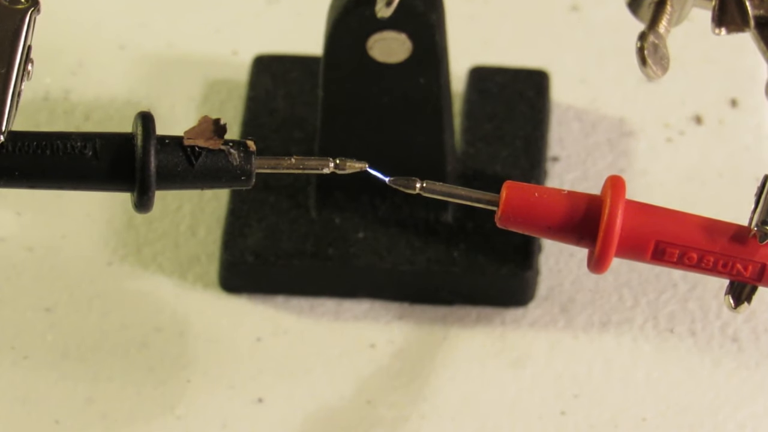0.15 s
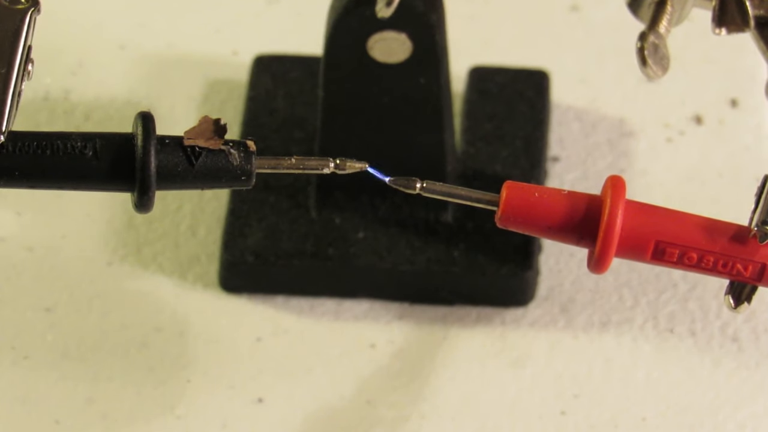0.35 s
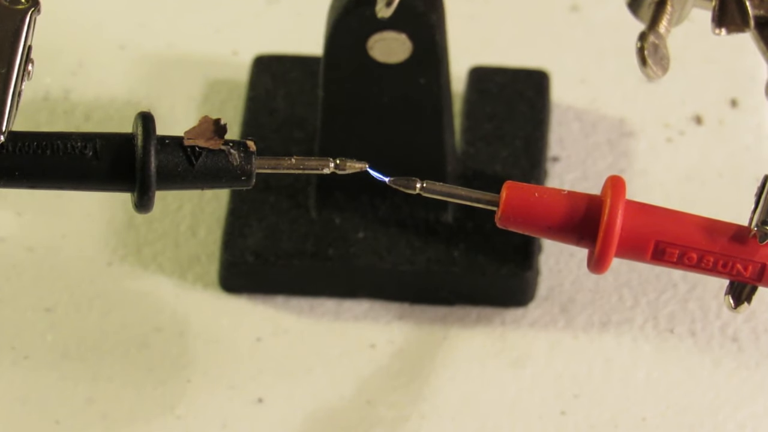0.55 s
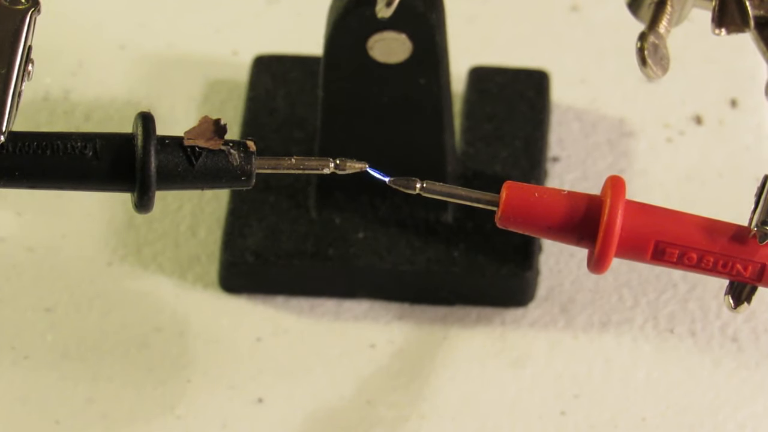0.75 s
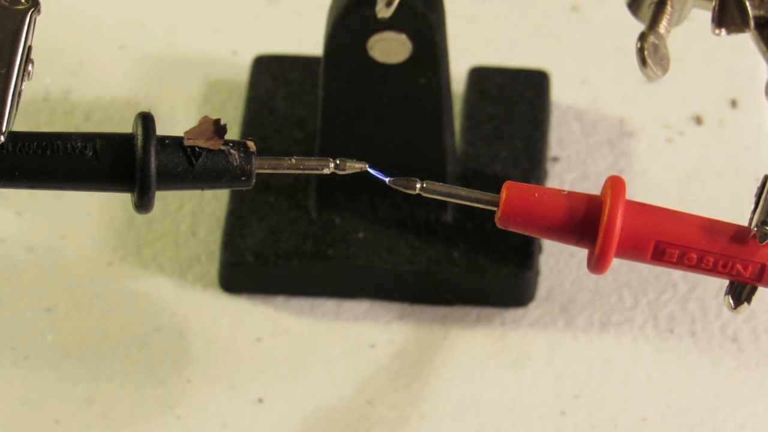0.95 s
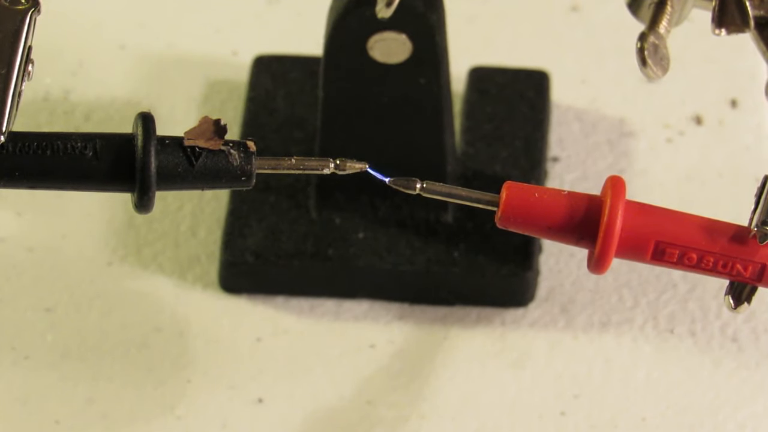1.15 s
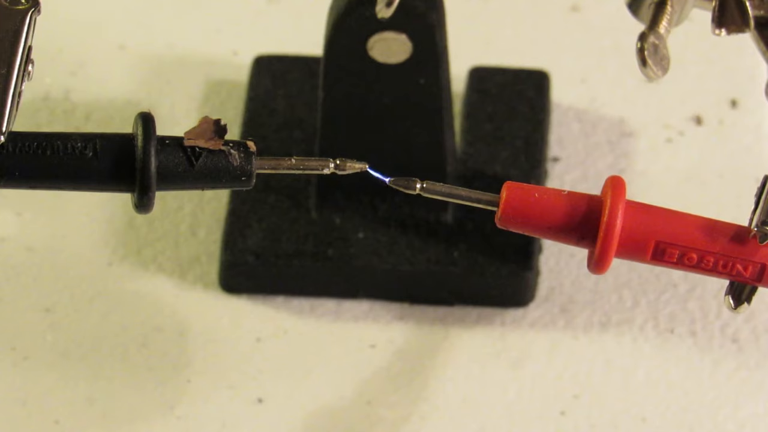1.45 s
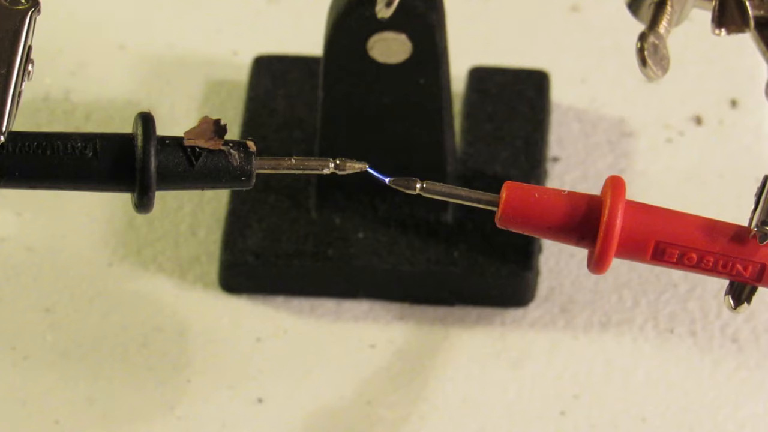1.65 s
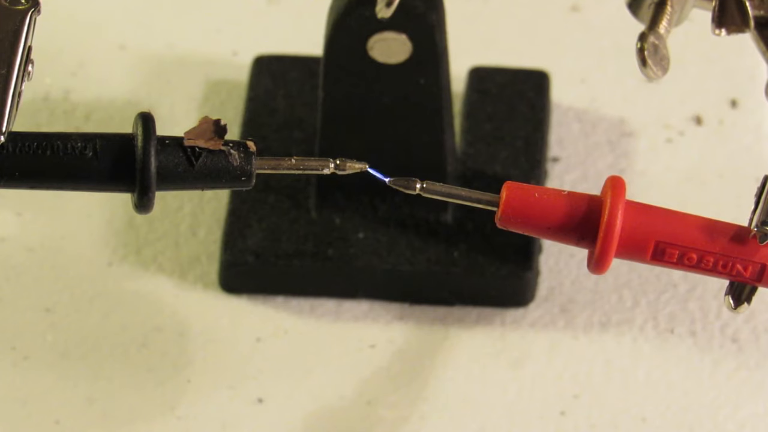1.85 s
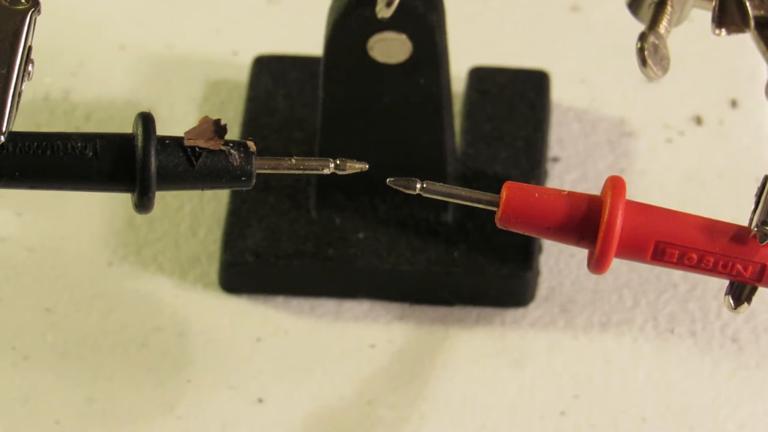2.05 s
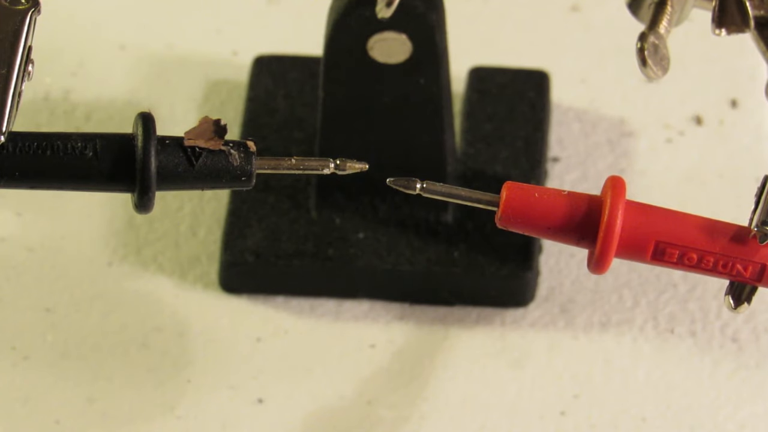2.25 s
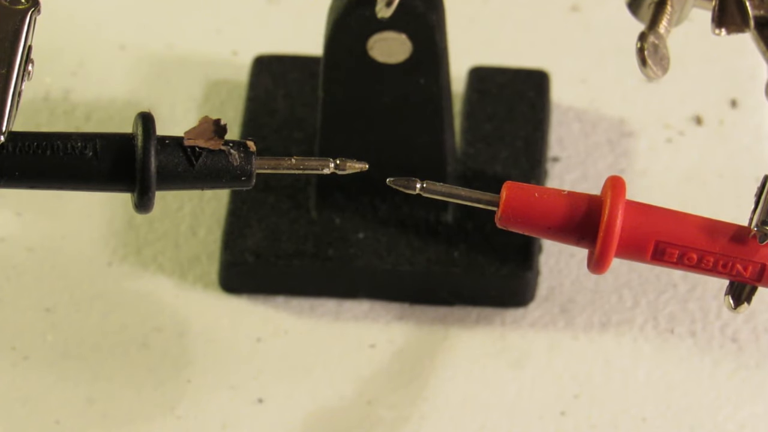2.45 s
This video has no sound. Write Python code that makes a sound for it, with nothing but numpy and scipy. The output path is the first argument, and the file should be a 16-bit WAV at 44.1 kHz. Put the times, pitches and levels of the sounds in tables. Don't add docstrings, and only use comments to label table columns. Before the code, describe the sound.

A harsh electric arc buzzes between two probe tips for nearly two seconds, cuts off, then spits two very short zaps. Faint steady fan hum and airy rumble in a small room, close stereo microphone.

```python
import sys
import numpy as np
from scipy import signal
from scipy.fft import rfft, irfft
from scipy.io import wavfile
from scipy.ndimage import uniform_filter1d

SR = 44100
rng = np.random.default_rng(int(sys.argv[2]) if len(sys.argv) > 2 else 0)


def volts_from_decibels(level):
    exponent = np.asarray(level, float) / 20
    return 10 ** exponent


def put_to_file(sound):
    columns = np.atleast_2d(sound).T
    safe = np.clip(columns, -1, 1)
    whole_steps = np.round(safe * 32767)
    wavfile.write(sys.argv[1], SR, whole_steps.astype(np.int16))


N = 114660
LEAD_S = .3


def shape(x, points):
    hz, db = np.array(points).T
    f = np.maximum(np.fft.rfftfreq(x.shape[-1], 1 / SR), 1)
    gain = volts_from_decibels(np.interp(np.log(f), np.log(hz), db))
    return irfft(rfft(x) * gain, x.shape[-1])


def bump(x, hz, width_hz, db):
    b, a = signal.iirpeak(hz, hz / width_hz, SR)
    return x + (volts_from_decibels(db) - 1) * signal.lfilter(b, a, x)


def set_rms(x, db):
    return x * volts_from_decibels(db) / np.sqrt(np.mean(x ** 2))


def clicks(times, sizes, size):
    at = times * SR
    near = np.floor(at).astype(int)[:, None] + np.arange(-7, 9)
    off = near - at[:, None]
    window = np.cos(np.pi * off / 16) ** 2
    out = np.zeros(size)
    np.add.at(out, near, sizes[:, None] * np.sinc(off) * window)
    return out


# frequency_hz, density_db_per_hz
AIR_MID = [(28, -42), (45, -11.5), (170, -4.5), (520, -10), (1350, -12.5), (1550, -19), (3500, -33),
           (15000, -41.5)]
# frequency_hz, density_db_per_hz
AIR_SIDE = [(28, -39), (50, -9.5), (170, -5.5), (560, -18.5), (1100, -24), (1500, -43.5), (8000, -45),
            (15000, -49)]


def moving_air():
    mid = set_rms(shape(rng.standard_normal(N), AIR_MID), -50.5)
    mid = bump(mid, hz=672, width_hz=170, db=-25)
    side = set_rms(shape(rng.standard_normal(N), AIR_SIDE), -50)
    return np.array([mid + 1.3 * side, mid - side])


def waver():
    return uniform_filter1d(rng.standard_normal(N), size=6000) * np.sqrt(6000)


# pitch_hz, rms_db
FAN_TONES = [
    (848.5, -56),
    (1279, -56.5),
    (216.4, -65),
    (426, -70.5),
]


def fan_hum():
    turned_s = np.cumsum(1 + .0012 * waver()) / SR
    hum = np.zeros(N)
    for hz, db in FAN_TONES:
        hum += volts_from_decibels(db + 1.45 * waver()) * np.sqrt(2) * np.sin(2 * np.pi * hz * turned_s)
    return hum


def fading_ring():
    hz, width_hz, level_db, t60_s = 2900, 360, -52, .6
    b, a = signal.iirpeak(hz, hz / width_hz, SR)
    ring = set_rms(signal.lfilter(b, a, rng.standard_normal(N)), level_db)
    return ring * volts_from_decibels(-60 * np.arange(N) / SR / t60_s)


# start_s, end_s, level_db
BURNS = [
    (-.25, -.11, -17),
    (.2123, 2.0655, -19),
    (2.2121, 2.2418, -18),
    (2.3259, 2.336, -18),
]
# time_s, rate_hz
FIRING_RATE = [(.2, 731), (.42, 735), (.5, 730), (.9, 731), (1.0, 729.5), (1.35, 727), (1.7, 728.5),
               (2.0, 732)]
# time_s, jump_chance_per_firing (0 to 1)
RESTLESSNESS = [(.21, .75), (.26, .4), (.37, .6), (.42, .1), (.51, .6), (.55, .2), (.59, .7), (.63, .2),
                (.69, .65), (.92, .6), (.96, .2), (1.14, .38), (1.22, .85), (1.26, .25), (1.44, .32),
                (1.5, .65), (1.8, .4), (2.0, .2)]
# time_s,
# level_db
EFFORT = [(0.24, -23.5), (0.93, -24.5), (0.95, -23), (1.702, -24.5), (2.034, -23.5), (2.05, -23.5)]
# delay_s, spread_s, level_db
LATER_SPARKS = [
    (2.45e-4, 3e-5, -1),
    (6.4e-4, 4e-5, -2),
]
# frequency_hz, level_db
SPARK_COLOUR = [(700, -24.5), (1500, -13), (3500, -9), (6300, -0.5), (8200, 4), (11000, 5), (14000, 6.5),
                (15500, 8)]


def arc(size):
    slip_s, tremble_s, burst_restlessness = 1.05e-4, 4e-6, .8
    path_size_db, wobble_s, wobble_db = .8, 5e-6, .8
    sparks = [(0.000047, 0, 0.0037)] + LATER_SPARKS
    times, sizes = [], []
    for start, end, db in BURNS:
        k = np.arange(1500)
        luck = rng.random((len(k), 2)).T
        z = rng.standard_normal((len(k), 12)).T
        rough_t = start + k / 742
        if end - start > 1:
            jump_chance = np.interp(rough_t, *np.array(RESTLESSNESS).T)
        else:
            jump_chance = burst_restlessness
        jump = luck[0] < jump_chance
        period = 1 / np.interp(rough_t, *np.array(FIRING_RATE).T)
        gaps = period - jump * slip_s * luck[1] + tremble_s * z[0]
        t = start + np.cumsum(gaps) - gaps[0]
        path = np.maximum.accumulate(k * jump)
        effort = np.interp(t, *np.array(EFFORT).T)
        gain = db + effort - effort.mean()
        burning = t < end
        for j, (delay, spread, rel_db) in enumerate(sparks):
            spark_t = t + delay + spread * z[j, path] + wobble_s * z[6 + j]
            spark_db = gain + rel_db + path_size_db * z[3 + j, path] + wobble_db * z[9 + j]
            times.append(spark_t[burning])
            sizes.append(volts_from_decibels(spark_db[burning]))
    at = np.concatenate(times) + LEAD_S - 8 / SR
    return shape(clicks(at, np.concatenate(sizes), size), SPARK_COLOUR)


# frequency_hz, width_hz, gain_db
COLOUR_BANDS = [(750, 80, 0.5), (1570, 360, 11.5), (2085, 120, 4), (2226, 86, -12.5), (2844, 115, 6.5),
                (3340, 440, -1), (4000, 430, -3), (4390, 580, 7), (5860, 300, -2), (7640, 720, 5.5), (9930, 520, 6),
                (10760, 800, -3.5), (12370, 550, 7), (13100, 800, -6)]


def colour_bands(x):
    for hz, width_hz, db in COLOUR_BANDS:
        x = bump(x, hz, width_hz, db)
    return x


# delay_ms, left_db, right_db
ECHOES = [(.36, -9, -7), (.455, -10, -11), (.75, -13, -12), (1.05, -14, -16), (1.6, -16, -15),
          (2.3, -17, -16)]


def early_echoes(size):
    ms, left_db, right_db = np.array(ECHOES).T
    at = np.append(0, ms / 1000) + 8 / SR
    return np.array([clicks(at, volts_from_decibels(np.append(0, db)), size) for db in (left_db, right_db)])


# frequency_hz, t60_s, level_db
RING = [(1490, 0.121, 3.5), (2900, 0.33, 0), (4200, 0.19, 4), (7800, 0.27, -5), (14000, 0.16, 1)]


def room_ring(t):
    gap_s = .003
    ring = 0
    for hz, t60, db in RING:
        sos = signal.butter(2, [hz / 1.4, min(hz * 1.4, 20000)], "band", fs=SR, output="sos")
        ring = ring + signal.sosfilt(sos, rng.standard_normal((2, len(t)))) * volts_from_decibels(db - 60 * t / t60)
    return ring * np.clip(t / gap_s - 1, 0, 1)


def near_clutter(t):
    return rng.standard_normal((2, len(t))) * volts_from_decibels(-60 * t / .025) * (t > .001)


def unit(v):
    return v / np.sqrt(np.sum(v ** 2) / 2)


def space(x):
    room_db, near_db, wide_hz, left_db, side_db = -9, -12, 6000, 1.8, 1.5
    size = SR // 2
    t = np.arange(size) / SR
    response = unit(early_echoes(size)) + volts_from_decibels(room_db) * unit(room_ring(t)) + volts_from_decibels(near_db) * unit(near_clutter(t))
    left, right = signal.fftconvolve(x[None], response)[:, :len(x)]
    mid = (left + right) / 2
    side = volts_from_decibels(side_db) * (left - right) / 2 + (volts_from_decibels(left_db / 2) - 1) * mid
    side = signal.sosfiltfilt(signal.butter(3, wide_hz, "high", fs=SR, output="sos"), side)
    return np.array([mid + side, mid - side])


# start_s, pitch_hz, level_db, t60_s
KNOCKS = [
    (1.195, 70, -40.5, .08),
    (1.69, 1000, -38.5, 0.041),
    (2.49, 530, -58, .06),
]


def bench_knocks():
    t = np.arange(N) / SR
    knocks = np.zeros(N)
    for s, hz, db, t60 in KNOCKS:
        u = np.maximum(t - s, 0)
        knocks += volts_from_decibels(db - 60 * u / t60) * np.sin(2 * np.pi * hz * u)
    return knocks


def scene():
    lead = int(LEAD_S * SR)
    sparks = colour_bands(arc(N + lead))
    background = moving_air() + fan_hum() + fading_ring() + bench_knocks()
    return volts_from_decibels(12) * space(sparks)[:, lead:] + background


def band_limit(x):
    return signal.sosfilt(signal.butter(12, 16310, fs=SR, output="sos"), x)


def record(dry):
    x = signal.sosfilt(signal.ellip(12, .2, 80, 15030, fs=SR, output="sos"), dry)
    x = signal.sosfilt(signal.butter(2, 18, "high", fs=SR, output="sos"), x)
    return band_limit(x)


dry = scene()
out = record(dry)
put_to_file(out)
```